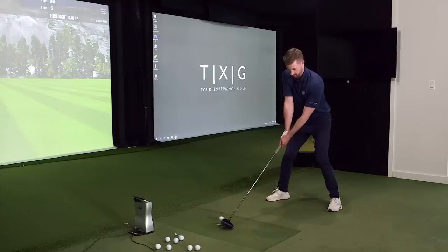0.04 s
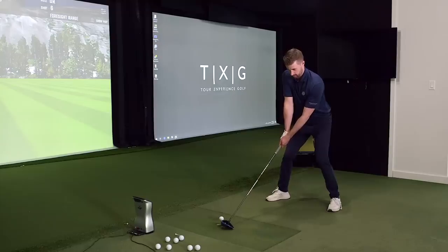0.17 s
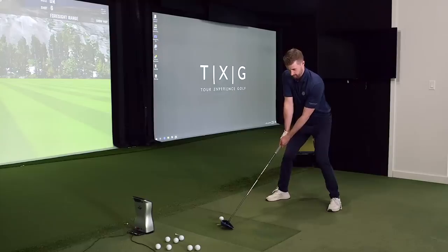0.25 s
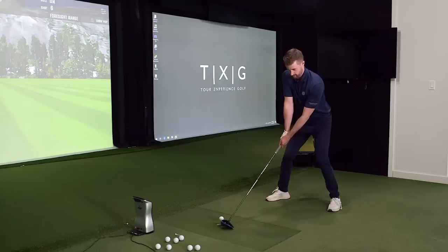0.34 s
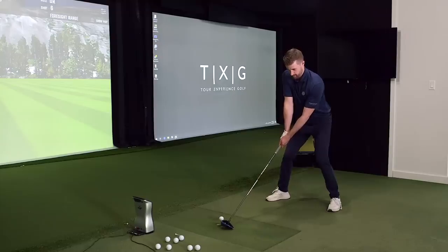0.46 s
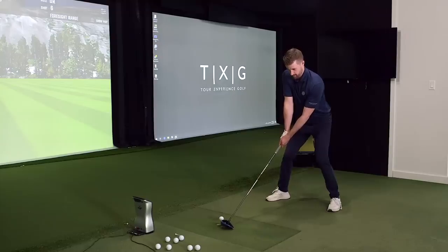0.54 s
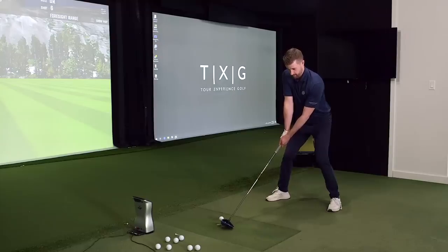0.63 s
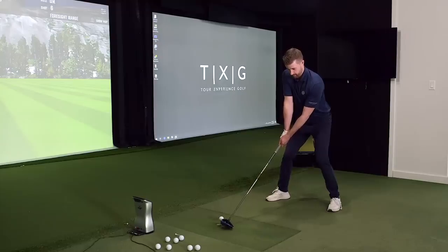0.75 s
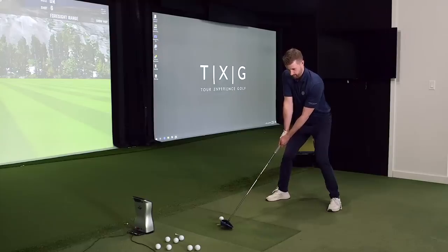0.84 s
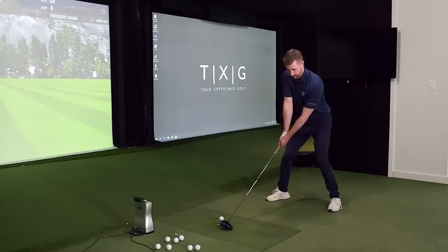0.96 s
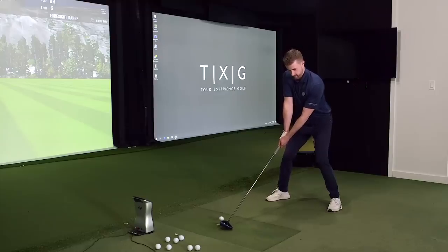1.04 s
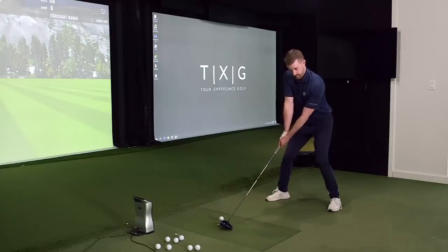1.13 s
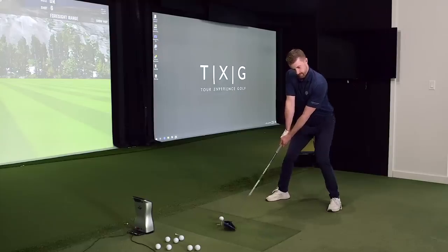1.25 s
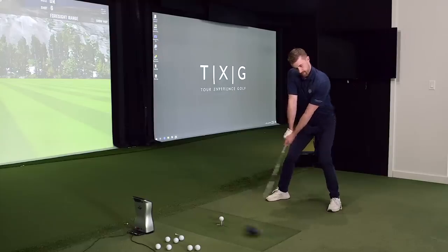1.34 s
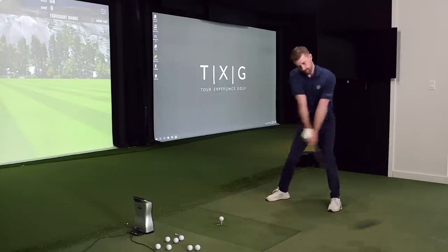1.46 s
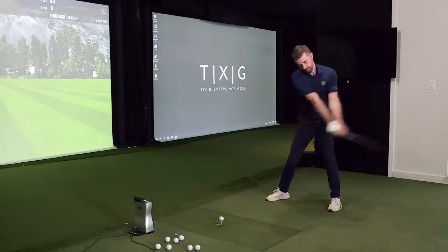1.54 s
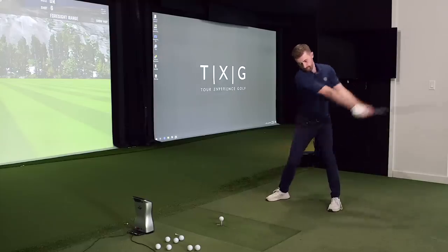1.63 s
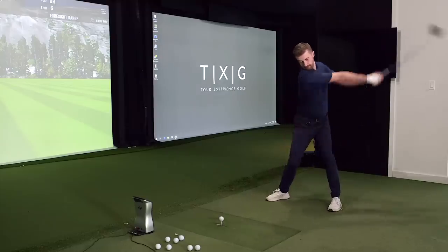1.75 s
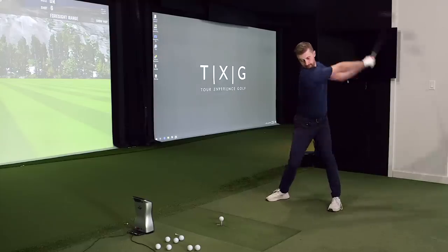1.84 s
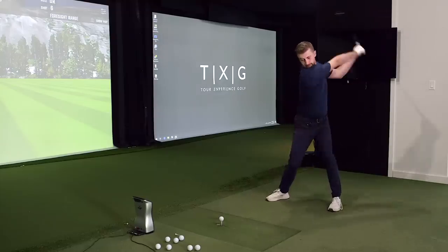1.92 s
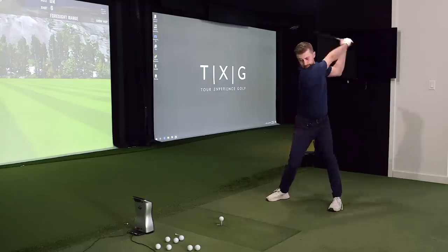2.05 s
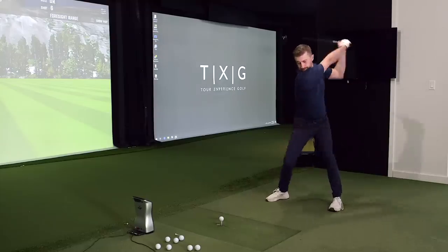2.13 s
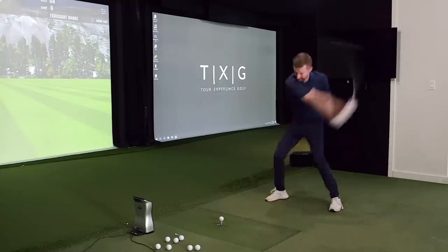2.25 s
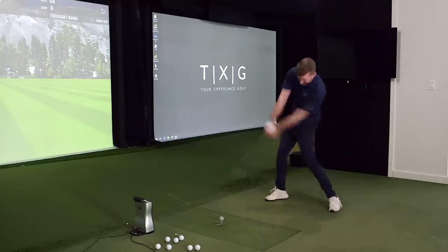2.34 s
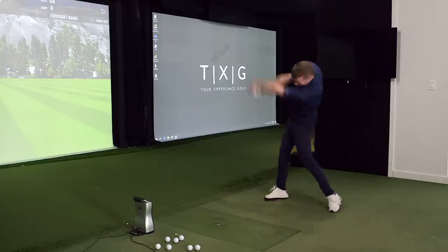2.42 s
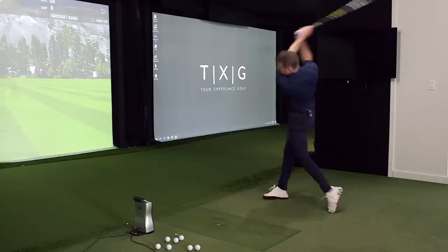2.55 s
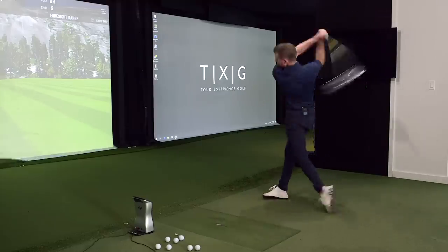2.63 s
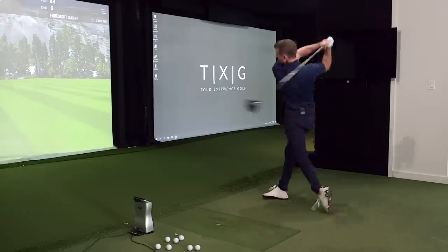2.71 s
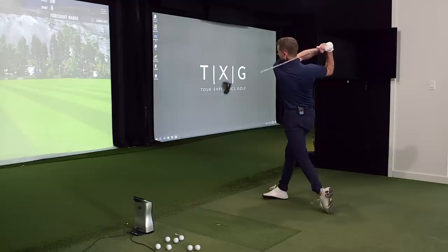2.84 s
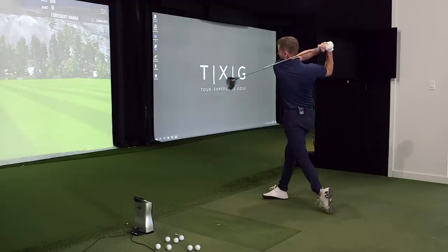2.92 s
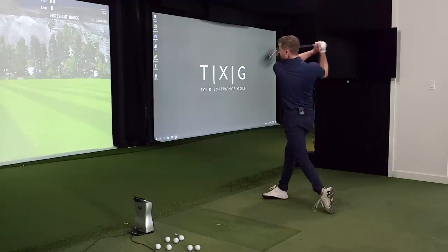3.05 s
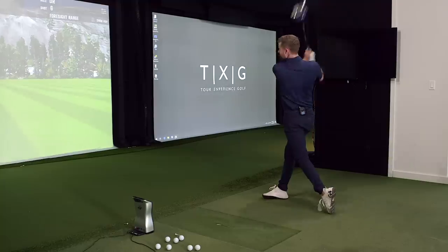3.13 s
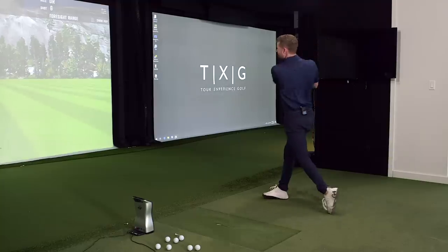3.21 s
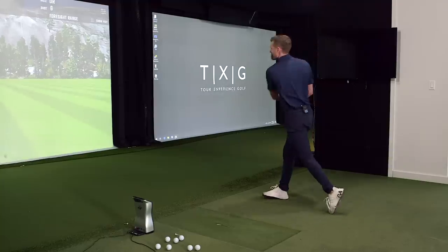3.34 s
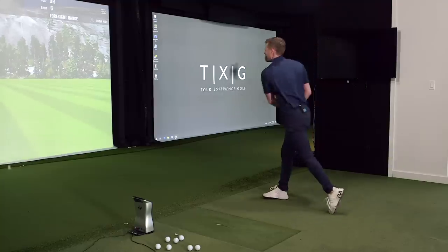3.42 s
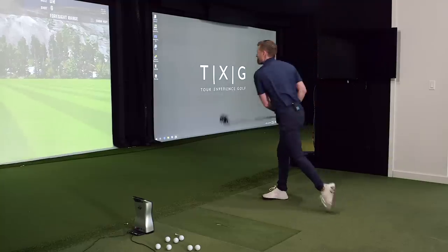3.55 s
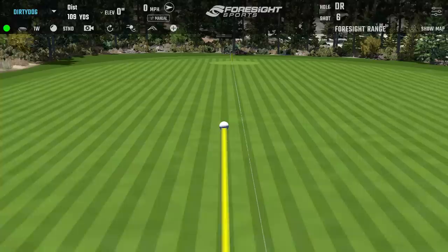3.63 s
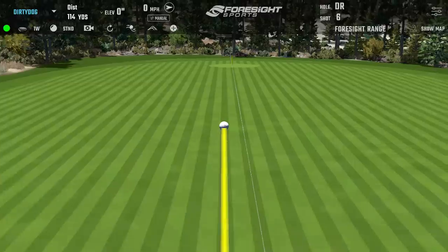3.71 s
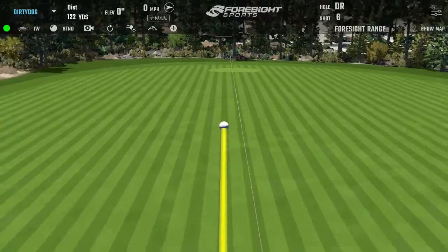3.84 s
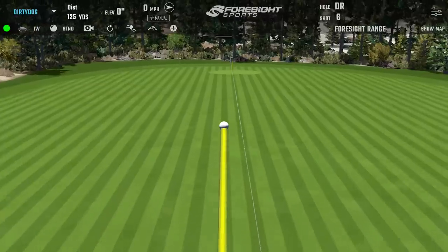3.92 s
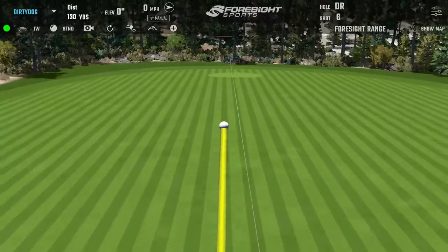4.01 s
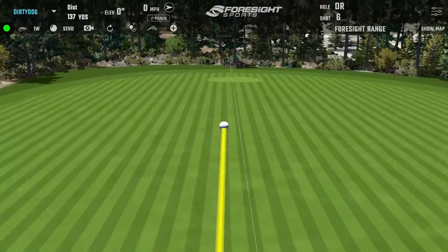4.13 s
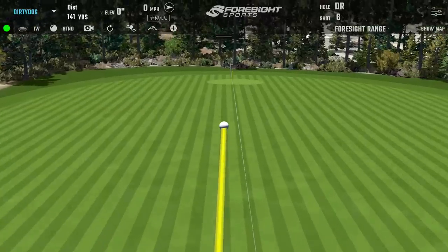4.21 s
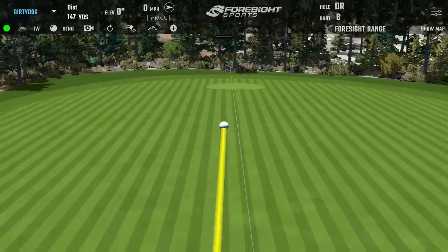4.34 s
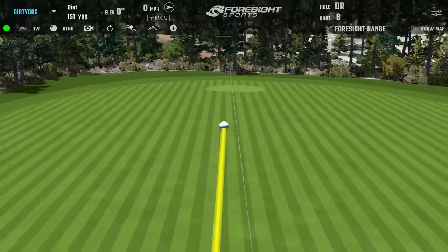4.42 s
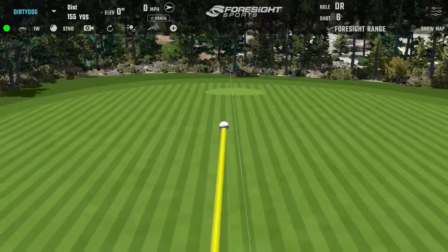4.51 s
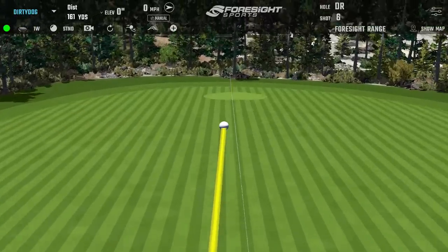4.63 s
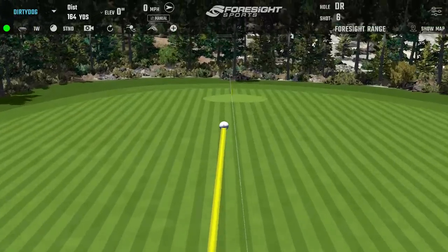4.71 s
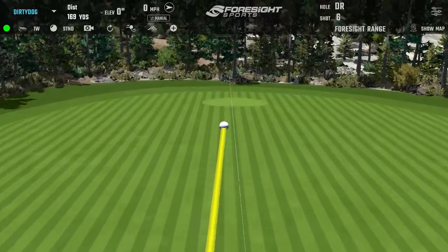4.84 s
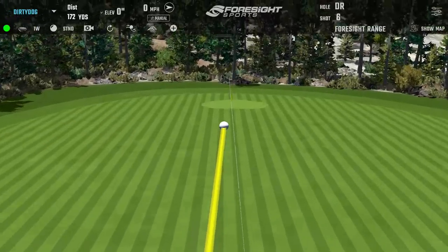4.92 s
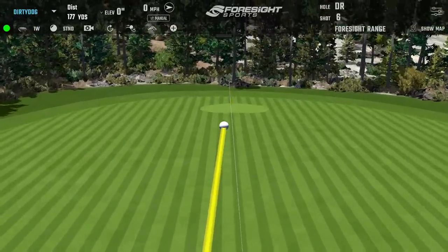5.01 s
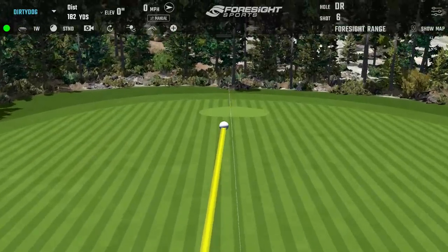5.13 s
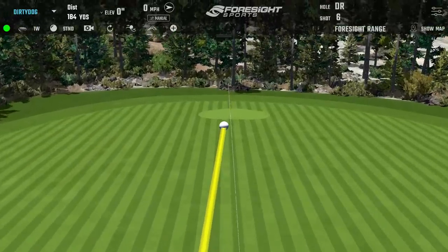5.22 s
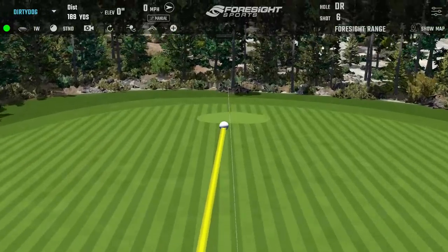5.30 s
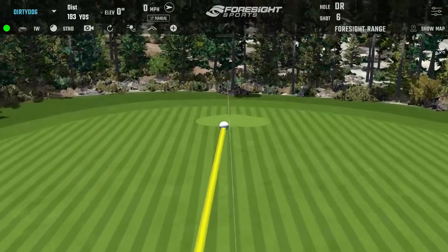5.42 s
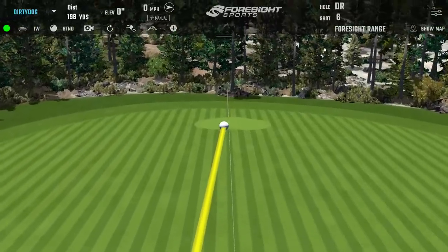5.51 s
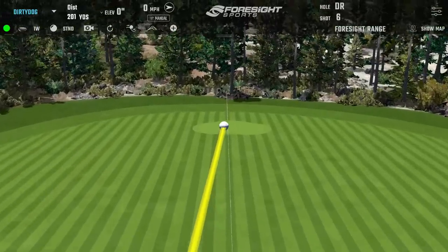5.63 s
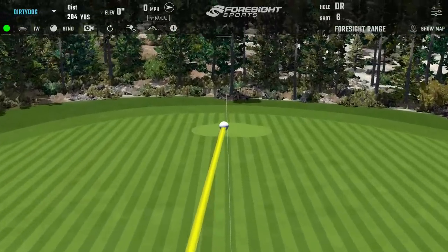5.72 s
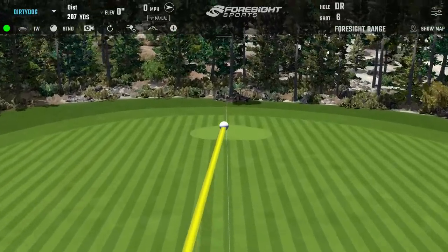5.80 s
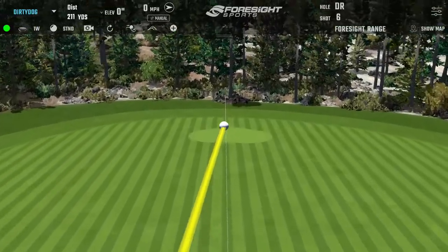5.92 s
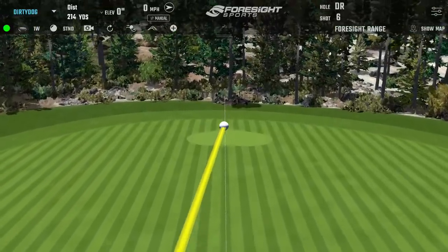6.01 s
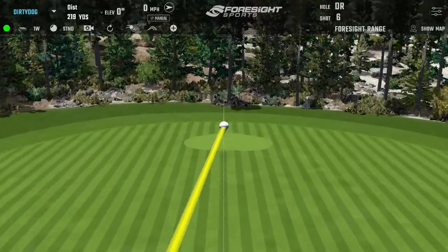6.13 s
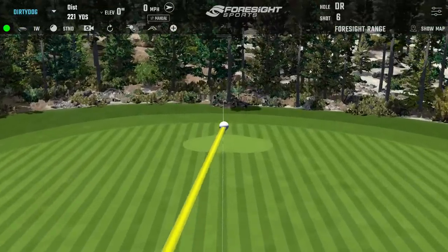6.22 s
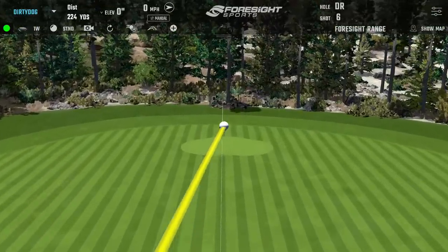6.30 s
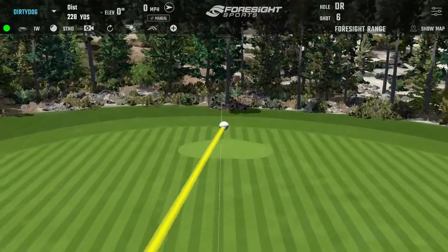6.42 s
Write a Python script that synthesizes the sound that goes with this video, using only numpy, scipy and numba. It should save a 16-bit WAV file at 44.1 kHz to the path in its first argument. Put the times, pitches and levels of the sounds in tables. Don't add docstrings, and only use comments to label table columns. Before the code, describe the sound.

Steady low ventilation wash, with shirt fabric brushing a body-worn microphone more strongly as the golfer moves. Cable jerks pop twice before the downswing's gusty whoosh peaks in an overloaded driver crack with short hollow ringing. The ball thumps a hanging screen, bass lingers in the room, the light tee skips with high ticks, and finally cloth rustles and shoes drag over artificial turf.

```python
import sys
import numpy as np
from scipy import signal
from scipy.fft import rfft, irfft
from scipy.io import wavfile
from scipy.ndimage import uniform_filter1d
from numba import njit

SR = 44100
rng = np.random.default_rng(int(sys.argv[2]) if len(sys.argv) > 2 else 0)


def invert_db(x):
    u = np.asarray(x, float) / 20
    return 10 ** u


def pcm_store(signal):
    levels = np.round(np.clip(np.atleast_2d(signal), -1, 1) * 32767)
    wavfile.write(sys.argv[1], SR, levels.astype(np.int16).T)


N = 284930
TIME = np.arange(N) / SR
STRIKE_S, SCREEN_S = 2.45273, 2.5287


def unit(x):
    return x / np.sqrt(np.mean(x ** 2))


def colour(points, size=N):
    hz, db = np.transpose(points)
    f = np.maximum(np.fft.rfftfreq(size, 1 / SR), 1)
    gain = invert_db(np.interp(np.log(f), np.log(hz), db))
    return unit(irfft(rfft(rng.standard_normal(size)) * gain, size))


def band(x, hz, width):
    return signal.lfilter(*signal.iirpeak(min(hz, .45 * SR), hz / width, SR), x)


def noise_band(noise, hz, width):
    return unit(band(band(noise, hz, width), hz, width))


def fade(at, t60, rise=1e-4):
    out = np.zeros(N)
    span = slice(int(at * SR) + 1, int((at + 2 * t60) * SR) + 9)
    t = TIME[span] - at
    out[span] = (1 - np.exp(-t / rise)) * 1000 ** (-t / t60)
    return out


def bell(at, before, after):
    return np.exp(-((TIME - at) / np.where(TIME < at, before, after)) ** 2)


def ring(at, modes):
    out = np.zeros(N)
    start = int(at * SR)
    span = slice(start, start + SR)
    t = TIME[span] - at
    for hz, db, t60 in modes:
        out[span] += invert_db(db) * fade(at, t60)[span] * np.sin(2 * np.pi * hz * t)
    return out


def pulse(at, points):
    hz, db = np.transpose(points)
    f = np.maximum(np.fft.rfftfreq(2048, 1 / SR), 1)
    fold = irfft(np.log(invert_db(np.interp(np.log(f), np.log(hz), db))))
    fold[1:1024] = 2 * fold[1:1024]
    fold[1025:] = 0
    click = irfft(np.exp(rfft(fold)))
    out = np.zeros(N)
    out[int(at * SR):][:len(click)] = click / np.abs(click).max()
    return out


def walk(rate):
    k = int(SR / rate)
    held = np.repeat(rng.standard_normal(N // k + 1), k)
    return unit(uniform_filter1d(uniform_filter1d(held, k), k)[:N])


@njit
def glide(x, hz, share):
    y, b, l = np.empty(len(x)), 0., 0.
    for i in range(len(x)):
        g = np.tan(np.pi * hz[i] / SR)
        v = (b + g * (x[i] - l)) / (1 + g * (g + share))
        b, l, y[i] = 2 * v - b, l + 2 * g * v, share * v
    return y


def stance(db):
    address_end, finish_end = 2.4, 5.11
    turn_s = .03
    corners = [address_end - turn_s, address_end + turn_s, finish_end - turn_s / 2, finish_end + turn_s / 2]
    return np.interp(TIME, corners, [db[0], db[1], db[1], db[2]])


def fans():
    # frequency in Hz, density in dB per Hz.
    air = [(12, -35), (20, -12), (49, -7.5), (126, -6.5), (180, -12), (245, -16), (372, -18.5), (492, -19),
           (615, -22), (960, -26.5), (1500, -30), (2840, -41.5), (14300, -55), (15500, -51)]
    # centre in Hz, width in Hz, level in dB.
    hum = [(358, 32, -70.5), (478, 12, -81.5), (584, 17, -72.5), (1545, 14, -79)]
    # Hz, then dB at address, at finish and stepping away.
    lines = [(46.4, -52, -60, -59), (92.7, -62.5, -68.5, -65), (141.6, -60, -63, -59.5),
             (59.5, -58, -53.5, -54), (119.2, -52, -52, -58)]
    draught_db = 5 * bell(1.8, .35, .35) + stance((0, .5, -1.5))
    out = invert_db(-55 + draught_db + .4 * walk(3.3) + .56 * walk(7.5)) * colour(air)
    for hz, width, db in hum:
        out = out + invert_db(db) * noise_band(rng.standard_normal(N), hz, width)
    for hz, *db in lines:
        phase = 2 * np.pi * np.cumsum(hz + .5 * walk(6)) / SR
        out = out + invert_db(stance(db) + 1.5 + 1.6 * walk(5)) * np.sin(phase)
    return out


def cloth():
    # frequency in Hz, density in dB per Hz.
    fibre_colour = [(2060, -28), (3500, -7.5), (4070, -6.5), (7490, 0), (8280, -0.5), (13000, 2.5),
                    (15500, 2.5)]
    # peak in seconds, level in dB, swell and release in seconds
    # (each spans 20 dB), dull body in dB.
    rubs = [(.468, -73, .3, 0.23, -11), (.604, -78, .04, .05, 2), (.81, -69.5, .2, 0.14, -1),
            (1.09, -76.5, .12, 0.26, -6), (1.39, -67, 0.23, 0.19, 0.5), (1.7, -61, 0.37, 0.24, -3),
            (1.81, -62, 0.075, 0.27, -6), (2.085, -58.5, 0.2, 0.1, -5.5), (2.21, -62, .2, .3, -4),
            (2.321, -57, .025, .04, 7), (2.332, -46, 0.028, .022, -2), (2.445, -41.5, 0.067, 0.023, -1.5),
            (2.89, -62, .03, .2, -9), (3.21, -62, 0.39, 0.37, 5), (3.885, -70, 0.22, 0.52, 4.5),
            (4.23, -67.5, 0.058, .2, 4.5), (4.54, -74, .02, 0.084, -4), (4.61, -72, .03, 0.064, -7),
            (4.735, -76, .1, .06, -2), (4.955, -63, 0.24, 0.15, 2.5), (5.085, -71, 0.31, .02, -19)]
    fine = colour(fibre_colour)
    body = unit(band(rng.standard_normal(N), 1400, 4000))
    slip = invert_db(1.2 * walk(120) + 1.1 * walk(30))
    out = invert_db(stance((-84, -82, -100))) * fine
    for s, db, swell, release, body_db in rubs:
        fall_db = 20 * np.maximum((s - TIME) / swell, (TIME - s) / release)
        out = out + invert_db(db - fall_db) * (fine + invert_db(body_db) * body)
    return slip * out


def shuffle():
    # start in seconds, peak in dB, centre in Hz, t60 in seconds.
    tick_table = [(1.305, -49, 1310, 0.0078), (1.9965, -44, 1300, 0.008), (2.0283, -33, 2180, 0.0035),
                  (2.039, -44, 500, 0.01), (2.085, -50, 1100, .006), (3.611, -44.5, 5500, 0.0037),
                  (4.380, -58, 4500, 0.005), (4.537, -57, 8000, 0.012), (4.561, -57.5, 7040, .01),
                  (4.612, -62, 2500, .015), (4.722, -59, 10000, 0.01), (4.737, -60, 9000, .01),
                  (5.075, -62, 4160, 0.0063), (5.42, -65, 2800, 0.012)]
    # start in seconds, level in dB, rise in seconds, t60 in seconds, centre in Hz.
    scuff_table = [
        (4.199, -52, 0.032, 0.41, 1660),
        (5.147, -54.5, 0.015, 0.35, 1450),
        (5.2, -63.5, 0.13, 1.8, 1870),
        (5.15, -53, .03, .9, 650),
        (5.745, -54.5, 0.013, 0.53, 1270),
        (5.74, -49, 0.0061, 0.22, 390),
        (2.3, -45, 0.014, 0.18, 270),
    ]
    noise = rng.standard_normal(N)
    ticks, scuffs = 0, 0
    for s, db, hz, t60 in tick_table:
        ticks = ticks + invert_db(db) * fade(s, t60) * noise_band(noise, hz, 1.2 * hz)
    for s, db, rise, t60, hz in scuff_table:
        scuffs = scuffs + invert_db(db) * fade(s, t60, rise) * noise_band(noise, hz, .9 * hz)
    return ticks + invert_db(1.2 * walk(90)) * scuffs


def pops():
    # start in seconds, jerk in dB, slip length in seconds, push in dB, push in Hz.
    tugs = [
        (1.77994, -19.5, .00085, -22, 70),
        (1.91859, -20.5, .00042, -32, 110),
    ]
    out, fizz = 0, rng.standard_normal(N)
    for s, jerk_db, slip, push_db, push_hz in tugs:
        for lag in (0, .55):
            out = out - invert_db(jerk_db) * fade(s + lag * slip, 1.9 * slip, .05 * slip)
        out = out + invert_db(push_db - 12.5) * (TIME > s) * (TIME < s + slip + .0003) * fizz
        back = s + slip
        swing_back = np.cos(2 * np.pi * push_hz * (TIME - back))
        out = out + invert_db(push_db) * fade(back, 3.9 / push_hz, 5e-5) * swing_back
    return out


def swing():
    # peak in seconds, level in dB.
    gusts = [
        (2.352, -36),
        (2.39, -28),
        (2.437, -35),
        (2.51, -39.5),
    ]
    rest_hz, top_hz = 95, 980
    hz = rest_hz + top_hz * bell(STRIKE_S, .059, .085)
    rush = rng.standard_normal(N)
    for _ in range(3):
        rush = glide(rush, hz, .52)
    rush = rush * np.sqrt(SR / hz)
    rush_db = -28.2 + 5.5 * np.log2(hz / top_hz) + 3.1 * walk(70)
    buffet = noise_band(rng.standard_normal(N), 90, 87)
    gust_level = sum(invert_db(db) * bell(s, .013, .013) for s, db in gusts)
    return rush * invert_db(rush_db) * bell(STRIKE_S, .13, .1), buffet * gust_level


def strike():
    # mode in Hz, level in dB, t60 in seconds.
    face_modes = [(2796, -16, .16), (2932, -11, .17), (3011, -16, .13), (5317, -12, .08)]
    # mode in Hz, level in dB, t60 in seconds.
    head_modes = [(668.7, -13.5, 0.017), (1150, -13, 0.051), (1282, -12.5, .06), (3630, -14, .05),
                  (3850, -11, 0.088), (4570, -14, 0.021), (5700, -11.5, 0.036), (6760, -14, .03),
                  (8769, -12.5, .03), (10600, -17, .02)]
    # frequency in Hz, density in dB per Hz.
    crack = [(60, -40), (200, -15.5), (400, -9), (1130, -6.5), (1900, -12.5), (2930, -7), (3400, -7.5),
             (5300, -7), (9560, -12), (15500, -17.5)]
    swell = 1 - fade(STRIKE_S, .022, 1e-6)
    return swell * ring(STRIKE_S, face_modes), swell * ring(STRIKE_S, head_modes), pulse(STRIKE_S, crack)


def ball():
    hz, db, peak_s, spread_s = 2270, 1, .0018, .00065
    t = TIME - STRIKE_S
    squash = (t > 0) * np.exp(-((t - peak_s) / spread_s) ** 2 / 2)
    return -invert_db(db) * squash * np.sin(2 * np.pi * hz * t)


def jolt():
    t = TIME - STRIKE_S - .0095
    push = invert_db(-10) * np.exp(-(t / .0037) ** 2)
    recoil = invert_db(-12.5) * np.exp(-((t - .0105) / .005) ** 2)
    flinch = invert_db(-15) * np.exp(-((t + .003) / .002) ** 2)
    return push - recoil - flinch


def screen(lag=0, boom_db=0, slap_db=0):
    # mode in Hz, level in dB, t60 in seconds.
    boom_modes = [(185, -2, .035)]
    # mode in Hz, level in dB, t60 in seconds.
    slap_modes = [(662, -2.5, .035), (500, -12, .04), (880, -14, .03)]
    at = SCREEN_S + lag
    return invert_db(boom_db) * ring(at + .0024, boom_modes) - invert_db(slap_db) * ring(at, slap_modes)


def boom():
    # delay in seconds, boom in dB, slap in dB.
    walls = [
        (.0135, -4, -6),
        (.0235, -3, -16),
        (.045, -8, -18),
    ]
    # mode in Hz, level in dB, t60 in seconds.
    room_modes = [(63, -1.5, .5), (81, -3, .9), (104, -6, 1), (128.5, -1, 1.1), (124.5, -1, 1.1),
                  (165, -7, 1.1), (222, -3, 0.28)]
    swell = 1 - fade(SCREEN_S, .072, 1e-6)
    return sum(screen(*wall) for wall in walls) + invert_db(-19.5) * swell * ring(SCREEN_S, room_modes)


def tee():
    # start in seconds, lower ring, upper ring and floor tick in dB, pitch ratio.
    bounces = [
        (2.88, -38, -44, -40, 1.004),
        (3.4982, -43, -41, -39.5, 1.002),
        (3.5011, -50, -43.5, -40, 1.003),
        (3.695, -48, -43, -45, .995),
        (3.8572, -47.5, -58, -60, .997),
        (3.9245, -51, -62, -60, 1.015),
    ]
    # frequency in Hz, t60 in seconds.
    stem_rings = [(11250, 0.01603), (12350, 0.019)]
    (low_hz, low_t60), (high_hz, high_t60) = stem_rings
    noise = rng.standard_normal(N)
    hiss = signal.sosfilt(signal.butter(4, 5200, "high", fs=SR, output="sos"), noise)
    stem, floor, wall = 0, 0, 0
    for s, low_db, high_db, tick_db, up in bounces:
        stem = stem + ring(s, [(low_hz * up, low_db, low_t60), (high_hz * up, high_db, high_t60)])
        floor = floor + invert_db(tick_db) * fade(s, .002)
        back = s + .0125
        wall = wall + invert_db(tick_db) * (invert_db(6) * fade(back, .003) + invert_db(-9.5) * fade(back, .11))
    flutter = 1 + .55 * unit(band(noise, 350, 500))
    return stem * flutter, floor * hiss + wall * band(hiss, 9500, 8000)


def bay(x):
    # frequency in Hz, early t60 and late t60 in seconds, late share in dB.
    decays = np.array([(59.6, 0.99, 0.72, -3.5), (260, 0.2, 1.1, 1), (563, .2, 1.1, 1.5),
                       (1000, 0.6, 1.367, -6.5), (3020, 0.32, 0.96, 0.5), (6000, 0.33, 0.87, -7.5),
                       (11000, 0.43, 0.49, -20.5), (16000, .2, .7, -24.5)])
    t, response = TIME[:2 ** 16], 0
    noise = rfft(rng.standard_normal(len(t)))
    octave = np.log2(np.maximum(np.fft.rfftfreq(len(t), 1 / SR), 1))
    for hz in 45 * 2 ** np.arange(0, 8.6, 1 / 3):
        early, late, late_db = (np.interp(np.log(hz), np.log(decays[:, 0]), c) for c in decays.T[1:])
        third = irfft(noise * np.clip(1 - 3 * np.abs(octave - np.log2(hz)), 0, 1))
        response = response + third * (1000 ** (-t / early) + invert_db(late_db) * 1000 ** (-t / late))
    response = response * np.clip((t - .0025) / .00068, 0, 1)
    return signal.fftconvolve(x, response / np.sqrt(np.sum(response ** 2)))[:N]


def scene():
    face, head, snap = strike()
    rush, buffet = swing()
    stem, ticks = tee()
    skips = np.roll(invert_db(1) * stem + invert_db(-3) * ticks, int(.0088 * SR))
    sent = invert_db(-7.5) * face + invert_db(-9.5) * head + invert_db(23.5) * snap
    sent = sent + screen(0, 1.3, -7.5) + invert_db(-7) * rush + skips
    near = ball() + face + invert_db(-4.5) * head + invert_db(-15) * snap + jolt()
    near = near + screen() + boom() + rush + buffet + stem + ticks
    return (near + bay(sent) + pops() + shuffle() + cloth() + fans())[None]


def low_pass(x):
    return signal.sosfilt(signal.butter(12, 15690, fs=SR, output="sos"), x)


def record(dry):
    mix = np.clip(dry, -1, 1)
    return low_pass(mix)


dry = scene()
out = record(dry)
pcm_store(out)
```